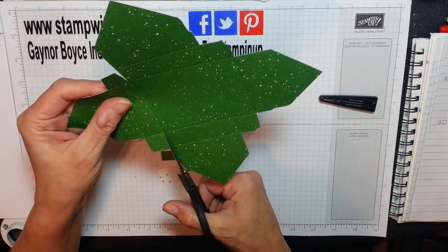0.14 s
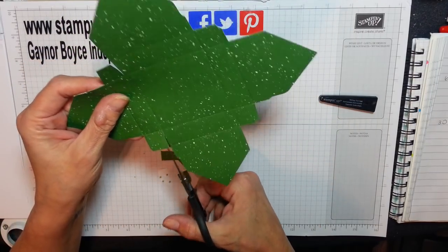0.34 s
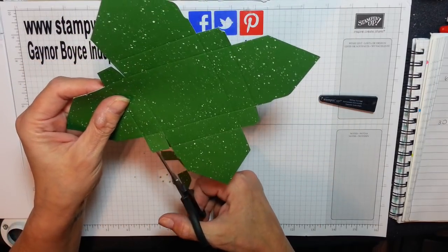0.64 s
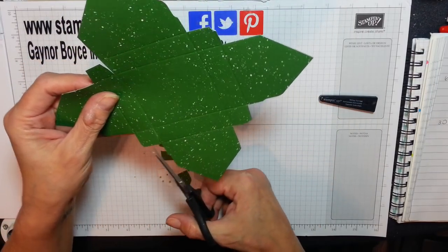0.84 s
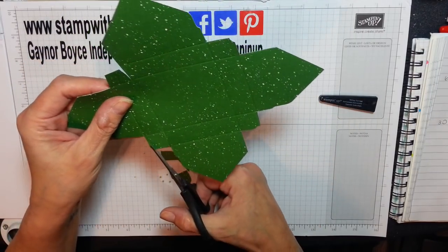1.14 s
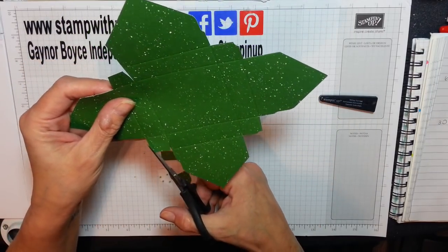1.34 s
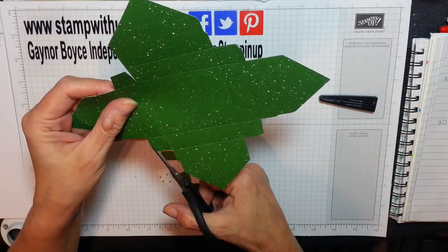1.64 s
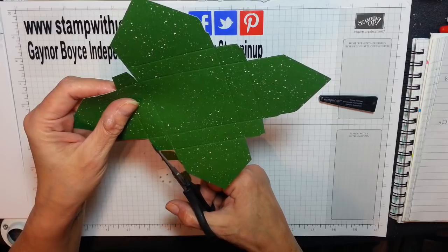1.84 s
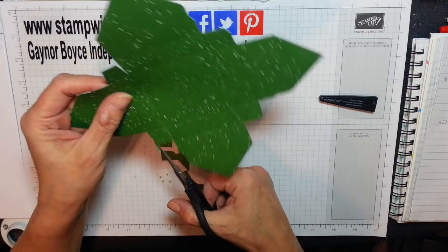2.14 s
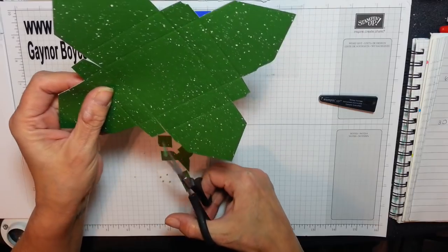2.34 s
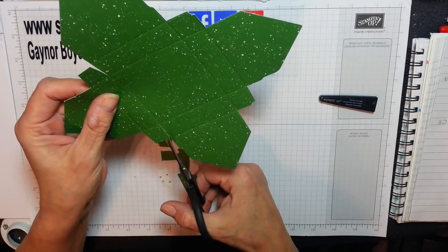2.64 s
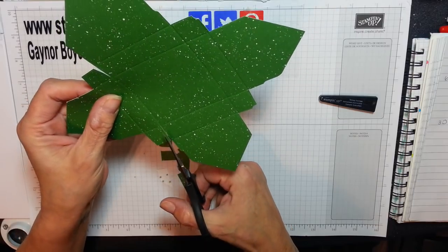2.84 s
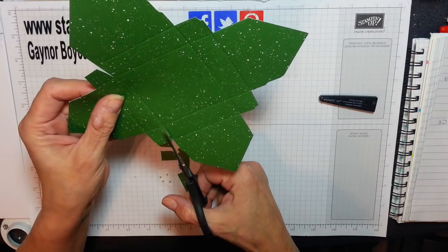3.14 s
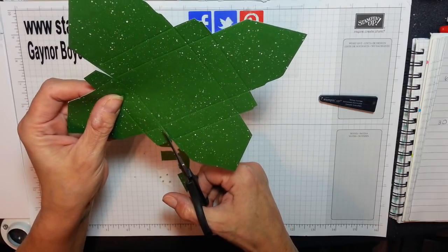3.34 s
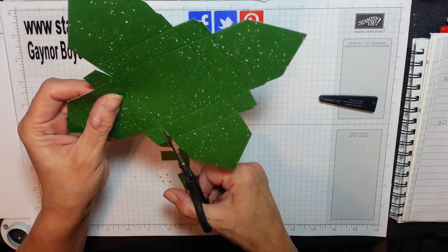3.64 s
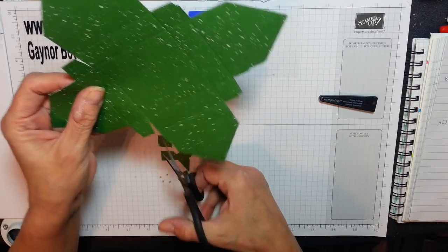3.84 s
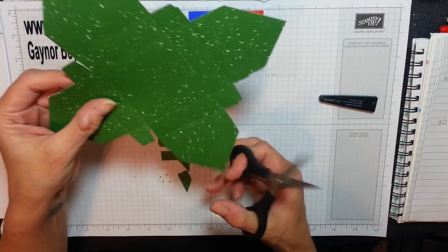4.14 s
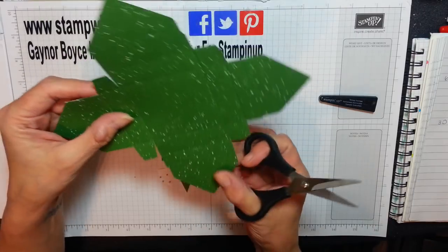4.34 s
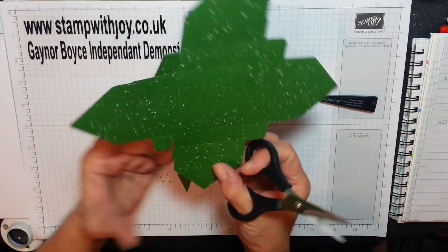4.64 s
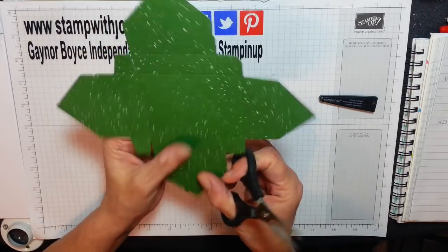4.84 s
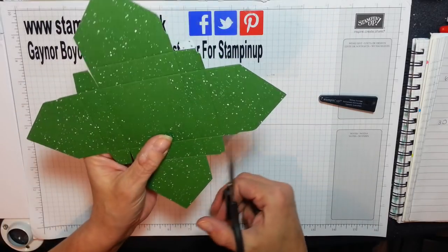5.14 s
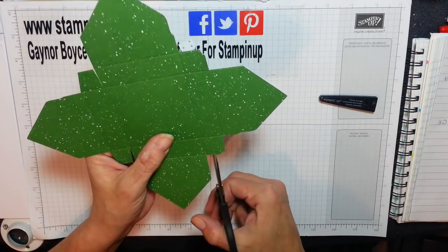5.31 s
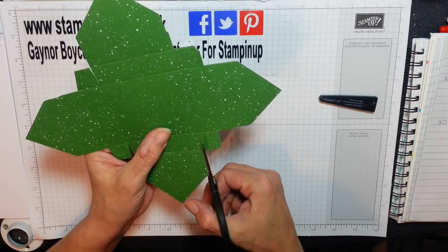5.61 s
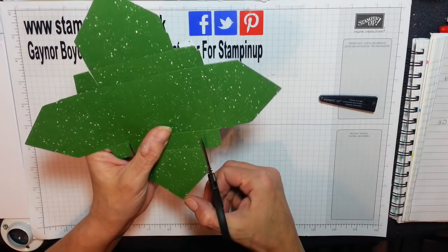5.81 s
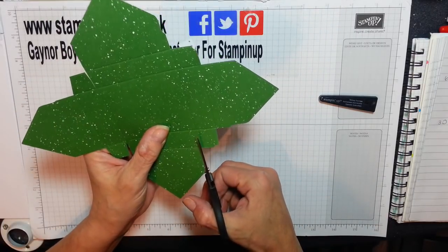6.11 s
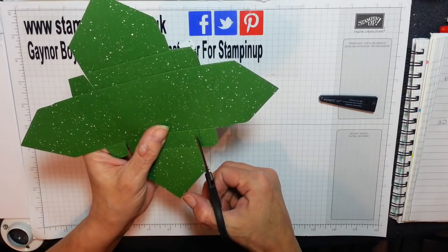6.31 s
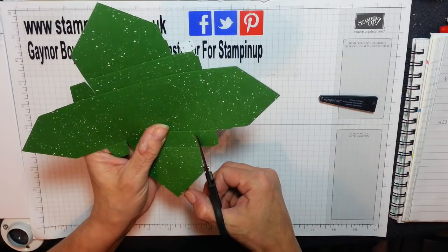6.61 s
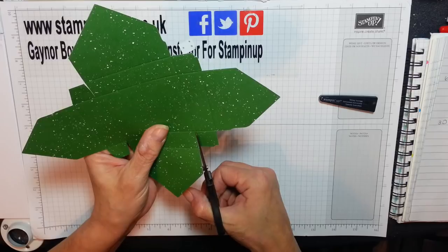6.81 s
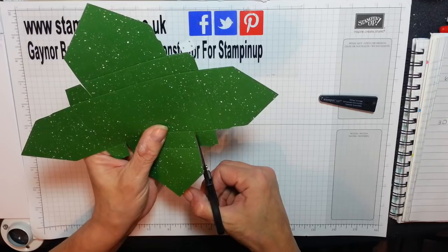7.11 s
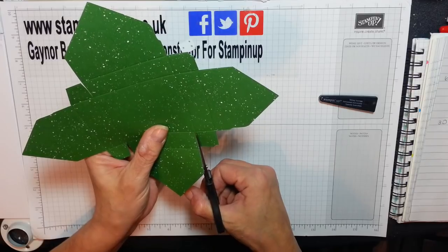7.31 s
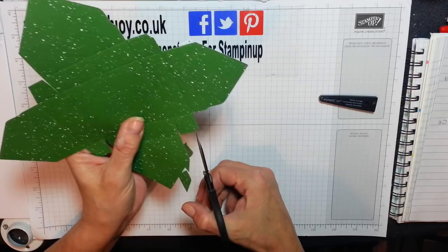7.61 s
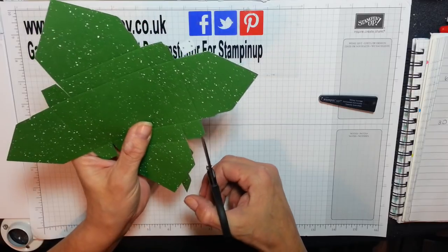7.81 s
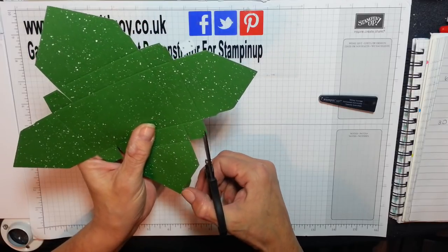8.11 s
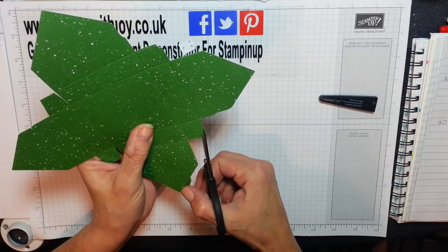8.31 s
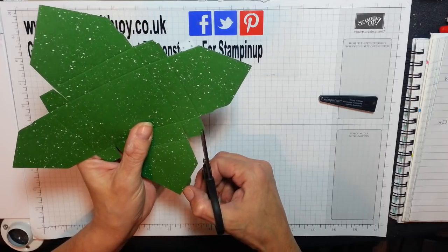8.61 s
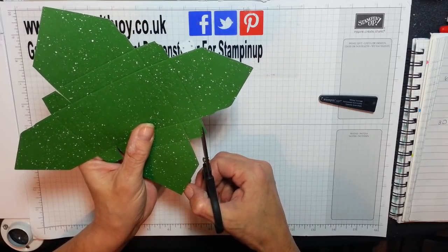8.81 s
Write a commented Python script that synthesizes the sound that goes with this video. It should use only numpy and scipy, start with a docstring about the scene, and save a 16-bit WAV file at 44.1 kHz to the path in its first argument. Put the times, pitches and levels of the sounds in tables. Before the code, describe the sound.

Close, dry snips and short rasps of scissors through thick card, a clattering cut midway, then quieter, slower cutting over a desk in a quiet room.

```python
"""Small scissors trim a cardstock shape above a desk in a small room.
The blades tear short bursts of fibres, made as random impulses, and rasp along the cut edge in gated strokes.
The sheet hisses and crinkles in the fingers as filtered impulses; its knocks and flexes ring damped modes.
Hand bumps ring desk modes over a rustle of noise that grows with the work.
Room reflections, still air, humming bands and a thin wavering whine complete the scene."""
import sys
import numpy as np
from scipy import signal
from scipy.fft import rfft, irfft, next_fast_len
from scipy.io import wavfile
from scipy.ndimage import uniform_filter1d, map_coordinates

SR = 44100
rng = np.random.default_rng(int(sys.argv[2]) if len(sys.argv) > 2 else 0)


def master(y):
    """Save y as 16-bit WAV."""
    cut = np.clip(np.atleast_2d(y).T, -1, 1)
    pcm = np.round(cut * 32767)  # scale
    wavfile.write(sys.argv[1], SR, pcm.astype(np.int16))


N = 395136

# Bites of the blades. Each row: start in seconds, length in seconds, crunch level in dB,
# sheet body in dB relative to the crunch (before body_db).
BITES = [(0.001, 0.012, -33, -11), (0.019, 0.0037, -35, -12), (0.034, 0.0072, -38.5, -10),
         (0.046, 0.011, -39, -13), (0.072, 0.0042, -29.5, -11.5), (0.09, 0.0077, -35, -13),
         (0.111, 0.0045, -26, -10), (0.119, 0.0026, -22, -10), (1.099, 0.0074, -47, -6),
         (1.638, 0.011, -48, -8.5), (1.678, 0.027, -48, -7), (1.82, 0.016, -35.5, -8),
         (1.896, .013, -41, -11.5), (1.945, 0.0066, -41, -17), (1.975, .004, -43.5, -4.5),
         (2.002, 0.0026, -18, -9.5), (2.179, .005, -23.5, -11), (2.897, 0.0046, -35, -14),
         (3.341, 0.011, -47.5, -7.5), (3.38, 0.01, -44.5, -7.5), (3.427, 0.014, -38.5, -6),
         (3.49, 0.0037, -38.5, 1.5), (3.521, 0.015, -37.5, -2.5), (3.58, 0.013, -42, -1.5),
         (3.655, 0.0018, -17, -9.5), (3.678, 0.0049, -24.5, -7), (3.928, 0.0027, -36.5, -17),
         (4.036, 0.0053, -36, -14), (4.124, .01, -27, -10), (4.138, .008, -19.5, -20),
         (5.92, 0.0066, -35, -9), (6.282, 0.0056, -49, 0), (6.309, 0.013, -47, -6),
         (6.347, 0.0092, -44, -7), (6.407, .005, -50.5, -6), (6.452, 0.0079, -50.5, -6),
         (6.47, 0.013, -49, -3), (6.501, 0.026, -48.5, -4), (6.559, 0.013, -44.5, -0.5),
         (6.61, 0.0078, -45.5, 2), (6.68, 0.015, -34, -4.5), (6.73, .012, -33, -7),
         (6.756, 0.012, -33.5, -7), (7.043, 0.0044, -34.5, -9), (7.075, 0.0097, -35, -7),
         (8.501, 0.0044, -38, -1)]
# Sliding strokes of the blades. Each row: start in seconds, end in seconds, rasp level in dB,
# swell from start to end in dB, sheet body in dB relative to the rasp (before body_db).
BLADE_STROKES = [(.325, 0.408, -38, 3, -11), (0.422, .512, -37, 5, -6), (.705, 0.766, -37.5, 2.5, -7.5),
                 (1.111, 1.253, -53, -14.5, -13), (2.125, 2.177, -48, 9, -8), (3.7, 3.77, -46.5, 1, -6.5),
                 (3.783, 3.887, -34.5, -4, -5), (4.092, 4.152, -29, 8, -12),
                 (7.475, 7.525, -41.5, -3.5, -9), (8.105, 8.187, -55, 14, -9.5),
                 (8.763, 8.797, -54, -7, -7)]
STROKE_ATTACK_S, STROKE_RELEASE_S = 0.01, 0.028  # time to gain or lose 20 dB
TIP_BODY_DB = 6  # extra swell of the sheet body as the cut runs out to the tips
# The sheet slides through the fingers as it is turned.
# Each row: start in seconds, end in seconds, level in dB before hiss_db or crinkle_db, swell in dB.
SHEET_TURNS = [(4.525, 4.565, -49.5, 7), (4.66, 4.82, -49.5, 3.5), (4.95, 5.41, -45, -3.5),
               (5.49, 5.72, -61, -12.5)]
TURN_ATTACK_S, TURN_RELEASE_S = 0.13, 0.11  # time to gain or lose 20 dB
# Faint rubbing of the steel blades at the pivot.
# Each row: start in seconds, end in seconds, level in dB before pivot_db, swell in dB.
PIVOT_RUBS = [(.6, .68, -60, 7), (1.81, 2, -58.5, 3), (2.64, 2.97, -69, 16), (3.27, 4.04, -60.5, 10.5),
              (5.91, 6.14, -67, -7), (6.3, 6.62, -64.5, 2), (8.05, 8.15, -67, 5), (8.71, 8.78, -67, 6)]
PIVOT_ATTACK_S, PIVOT_RELEASE_S = 0.047, 0.046  # time to gain or lose 20 dB
# The stiff sheet knocks against blade or hand.
# Each row: start in seconds, strength in dB before each part's gain, pitch of the struck flap in Hz.
SHEET_KNOCKS = [(0.118, -33.5, 930), (1.822, -43, 607), (2.002, -31, 986), (2.179, -32, 632),
                (3.653, -27, 1565), (4.075, -20, 487), (4.078, -26.5, 857), (4.096, -32, 480),
                (4.121, -38, 541.6), (4.152, -35, 813), (4.941, -32.5, 560), (4.957, -32, 800),
                (4.976, -40, 780), (5.922, -38, 506), (8.502, -35, 760)]
# Light ticks of the card's edge. Each row: start in seconds, strength in dB before tick_db.
EDGE_TICKS = [(4.454, -38.5), (4.498, -35), (4.567, -33), (4.94, -31), (5.512, -44), (7.654, -41),
              (7.668, -40), (7.683, -40), (7.722, -42.5)]
# Soft bumps of the hands. Each row: start in seconds, strength in dB before bump_db.
HAND_BUMPS = [(0.965, -41), (1.775, -40.5), (2.675, -46), (2.815, -45), (3.15, -44), (3.431, -38),
              (3.968, -37), (4.336, -39.5), (4.545, -42), (5.17, -40), (6.044, -38.5), (6.192, -38.5),
              (6.656, -37.5), (7.029, -40), (7.159, -35), (7.36, -47.5), (7.944, -37.5), (8.281, -43),
              (8.87, -46)]
# Every bite jolts the hands: dB (before bump_db) for a 0 dB crunch, and dB per dB of crunch.
JOLT_DB, JOLT_GROWS = -32.5, 0.35
# The whole sheet buckles as it is turned or let go. Each row: start in seconds, strength in dB.
SHEET_FLEXES = [(4.176, -41.5), (4.794, -30.5), (4.946, -32.5), (8.503, -42)]

# Spectrum of torn fibres. Each row: frequency in Hz, relative level in dB.
CRUNCH_SPECTRUM = [(200, -35), (1000, -19.5), (2500, -12), (4000, -5), (5500, -1), (7000, -4), (8500, -7.5),
                   (11000, -12.5), (14500, -22)]
# Spectrum of the sheet's crackle. Each row: frequency in Hz, relative level in dB.
BODY_SPECTRUM = [(100, -9.5), (350, -6.5), (650, -5.5), (1200, -6), (1700, -1.5), (2800, -2.5),
                 (4500, -17.5), (9000, -38.5)]
# Spectrum of steel on the cut edge. Each row: frequency in Hz, relative level in dB.
RASP_SPECTRUM = [(200, -25), (1000, -28.5), (2500, -13.5), (4000, -4), (5700, 0), (7000, 0), (8500, -7.5),
                 (11000, -13.5), (14500, -34.5)]
# Spectrum of card on skin. Each row: frequency in Hz, relative level in dB.
HISS_SPECTRUM = [(300, -13.5), (800, -18.5), (1300, -13.5), (2400, -15), (3600, -13), (5500, -4.5),
                 (7000, -5), (8800, -10.5), (11000, -16.5), (14500, -23.5)]
# Spectrum of blade on blade. Each row: frequency in Hz, relative level in dB.
STEEL_SPECTRUM = [(700, -13.5), (2000, -14), (3500, -10.5), (6000, -10.5), (7200, -4.5), (8200, -13),
                  (14000, -19.5)]
# Spectrum of a knock's contact. Each row: frequency in Hz, relative level in dB.
CRACK_SPECTRUM = [(150, -34), (500, -4.5), (1300, 1.5), (2500, -6), (5000, -2.5), (7500, -18.5),
                  (14000, -33)]
# Spectrum of the low rustle of the hands. Each row: frequency in Hz, relative level in dB.
RUSTLE_SPECTRUM = [(25, -36), (55, -25), (90, -4), (115, -16.5), (143, 2), (178, -12), (208, -2.5),
                   (250, -22.5), (305, -10), (350, -19), (450, -12), (520, -22), (900, -24), (2000, -37.5)]
# Spectrum of still air. Each row: frequency in Hz, relative level in dB.
AIR_SPECTRUM = [(25, -12), (140, -3.5), (450, -15.5), (600, -16), (900, -23), (1200, -24.5), (1380, -19.5),
                (1600, -23.5), (4500, -28.5), (7000, -27.5), (14500, -30)]

# Bending modes of the held sheet. Each row: frequency in Hz, width in Hz, relative level in dB.
SHEET_MODES = [(400, 67, -2), (506, 200, -6), (764, 45, -3), (1000, 120, 4.5), (1570, 307, 8),
               (2160, 970, -2.5)]
# Lowest modes of the buckling sheet. Each row: frequency in Hz, width in Hz, relative level in dB.
BUCKLE_MODES = [(123, 26, 2.5), (258, 19.4, -1.5), (337, 21, -6), (444, 11, -13), (560, 50, -11)]
# Resonances of the desk. Each row: frequency in Hz, width in Hz, relative level in dB.
DESK_MODES = [(92, 13, -20), (146.7, 22, -3), (211.6, 15, -8.5), (310.3, 17, -14.5), (447, 42, -12.5)]
# Humming bands of the room. Each row: frequency in Hz, width in Hz, relative level in dB.
HUM_BANDS = [(145, 19, -2), (206.5, 16, -3), (289, 23, -11), (394.7, 18, -5.5), (453.2, 17, -6)]
# The faint whine comes and goes. Each row: start in seconds, end in seconds, level in dB, swell in dB.
WHINE_SPANS = [(6.7, 8.2, -78, -0.5)]
WHINE_FADE_S = 0.3  # time to gain or lose 20 dB

# Decay of the wall reflections. Each row: frequency in Hz, time to fall 60 dB in seconds.
ROOM_DECAY = [(150, 0.33), (1000, 0.22), (4000, 0.21), (7000, 0.24), (14000, 0.097)]
# Likeness of diffuse sound at the two ears. Each row: frequency in Hz, left-right correlation.
EAR_LIKENESS = [(25, 0.52), (110, 0.96), (400, 0.74), (1000, 0.28), (2500, 0.06), (10000, .05)]
# Where the scissors work. Each row: time in seconds, left-minus-right level in dB.
WORK_PLACE = [(0, -1), (3, -3), (4.2, -2), (5.4, -2), (6.3, 1), (7.5, -2.5), (8.901, -1)]
# Unequal ears of the microphone. Each row: frequency in Hz, left-minus-right level in dB.
EAR_BALANCE = [(100, -1.5), (1000, 2.5), (2500, 1.5), (4500, 5.5), (7000, -5.5), (10000, -3.5),
               (14000, -2.5)]
TOP_HZ = 14900  # nothing passes above this


def snips(crunch_db=0, body_db=1, rise=0.00064, fall=0.0021, scrape_db=-17, approach=0.015):
    """Brittle fracture: after a scrape, fibres tear in a burst and the sheet adds a lower crackle; times in s."""
    crunch, body = np.zeros(N), np.zeros(N)
    catching = amp(1.9 * wobble(600))
    for s, length, db, sheet_db in BITES:
        first = max(int((s - 0.04) * SR), 0)
        span = np.arange(first, int((s + length + 0.02) * SR))
        t = span / SR - s
        bite = np.exp(np.minimum(t, 0) / rise)
        # a slow bite scrapes more on its way in than a quick snap
        slowness = min(length / 0.0055, 1) ** 2
        scrape = amp(scrape_db) * slowness * np.exp(np.minimum(t, 0) / approach)
        release = np.exp(-np.maximum(t - length, 0) / fall)
        burst = catching[span] * np.maximum(bite, scrape) * release
        # the energy of a burst follows its length
        burst *= np.sqrt(length * SR / (np.sum(burst ** 2) + 1e-12))
        crunch[span] += amp(db + crunch_db) * burst
        body[span] += amp(db + sheet_db + body_db) * burst
    tearing = coloured(crunch * fibres(rate=12000, spread_db=3.0), CRUNCH_SPECTRUM)
    crackle = coloured(body * fibres(rate=9000, spread_db=2), BODY_SPECTRUM)
    return tearing + crackle


def strokes(rasp_db=0, body_db=-1, catch_db=1.0, slip_db=0.5, grip_db=1.15, tear_db=2.5):
    """Stick-slip friction: steel catches and slips along the cut edge; tearing shakes the sheet unevenly."""
    drag = unit(amp(grip_db * wobble(45) + catch_db * wobble(150) + slip_db * wobble(700)))
    edge, sheet = [], []
    for start, end, db, swell, sheet_db in BLADE_STROKES:
        edge.append((start, end, db + rasp_db, swell))
        sheet.append((start, end, db + sheet_db + body_db, swell + TIP_BODY_DB))
    rasp = drag * level(edge, STROKE_ATTACK_S, STROKE_RELEASE_S)
    shaking = unit(amp(tear_db * wobble(300)))
    body = drag * shaking * level(sheet, STROKE_ATTACK_S, STROKE_RELEASE_S)
    rasping = coloured(rasp * fibres(rate=9000, spread_db=4.0), RASP_SPECTRUM)
    return rasping + coloured(body * fibres(rate=2000, spread_db=2.5), BODY_SPECTRUM)


def rubbing(hiss_db=-0.5, pivot_db=1, crinkle_db=-14):
    """Sliding friction: dense fine contacts hiss on skin and steel; sparse ones crinkle in the bending card."""
    sliding = level(SHEET_TURNS, TURN_ATTACK_S, TURN_RELEASE_S)
    skin = sliding * fibres(rate=6000, spread_db=3) * amp(hiss_db + 1.5 * wobble(80))
    crinkle = sliding * fibres(rate=270, spread_db=8) * amp(crinkle_db)
    pivot = level(PIVOT_RUBS, PIVOT_ATTACK_S, PIVOT_RELEASE_S)
    steel = pivot * fibres(rate=4200, spread_db=8.0) * amp(pivot_db + 2.8 * wobble(46))
    hiss = coloured(skin, HISS_SPECTRUM)
    return hiss + coloured(crinkle, CRUNCH_SPECTRUM) + coloured(steel, STEEL_SPECTRUM)


def knocks(sheet_db=-4, sheet_t60=0.11, flap_db=-2, flap_t60=0.039,
           crack_db=-3, crack_t60=0.022, tick_db=-1, tick_t60=0.023):
    """Impact excitation: a knock cracks and rings flap and bending modes; an edge tick is only a brief crackle."""
    sheet, contact, edge = np.zeros((3, N))
    t = np.arange(SR // 8) / SR
    for s, db, hz in SHEET_KNOCKS:
        flap = amp(flap_db - 60 * t / flap_t60) * np.sin(2 * np.pi * hz * t)
        # sheet_t60 damps the modes on top of their own decay
        bending = amp(sheet_db - 60 * t / sheet_t60) * ring(SHEET_MODES, t, scatter_db=5.5)
        add(sheet, s, amp(db) * (flap + bending))
        add(contact, s, amp(db + crack_db - 60 * t / crack_t60))
    for s, db in EDGE_TICKS:
        add(edge, s, amp(db + tick_db - 60 * t / tick_t60))
    crack = coloured(contact * fibres(rate=16000, spread_db=0.5, shared=0.27), CRACK_SPECTRUM)
    ticks = coloured(edge * fibres(rate=11000, spread_db=2.0), CRUNCH_SPECTRUM)
    return sheet + crack + ticks


def hands(work, bump_db=1, soft=0.0075, rest_db=-70, busy_db=-32, follows=0.48, effort_s=0.087):
    """Soft excitation: gradual pushes ring desk and sheet; a low uneven rustle grows with the work of the hands."""
    desk, t = np.zeros(N), np.arange(SR // 4) / SR
    push = 1 - np.exp(-t / soft)
    jolts = [(s, JOLT_DB + JOLT_GROWS * db) for s, _, db, _ in BITES]
    for s, db in HAND_BUMPS + jolts:
        add(desk, s, amp(db + bump_db) * push * ring(DESK_MODES, t, scatter_db=1.0))
    for s, db in SHEET_FLEXES:
        add(desk, s, amp(db) * push * ring(BUCKLE_MODES, t, scatter_db=0.5))
    effort = uniform_filter1d(np.abs(work).mean(axis=0), int(effort_s * SR) + 1)
    rustle = np.hypot(amp(rest_db), amp(busy_db) * np.abs(effort) ** follows)
    noise = rush(lambda hz: amp(along(RUSTLE_SPECTRUM, hz)))
    return desk + rustle * amp(2.4 * wobble(16)) * noise


def room(x, near_db=-6, near_t60=0.007, tail_db=-8, lag=0.00015):
    """Propagation: the right ear leads by lag (s); reflections are redrawn every third of a second and crossfaded."""
    hop = SR // 3
    # overlapping pieces, each with a new echo; the squared fades sum to one
    fade = np.sin(np.pi * np.arange(2 * hop) / (2 * hop))
    padded = np.pad(x, [(0, 0), (hop, 2 * hop)])
    wet = np.zeros((2, N + hop))
    for i in range(0, N + hop, hop):
        piece = padded[:, i:i + 2 * hop] * fade
        add(wet, i / SR, signal.fftconvolve(piece, echo(near_db, near_t60, tail_db), axes=1))
    late_left_early_right = np.array([[1], [-1]])
    direct = filtered(x, lambda hz: np.exp(-1j * np.pi * hz * lag * late_left_early_right))
    return (direct + diffuse(wet[:, hop:])) / np.sqrt(1 + amp(near_db) ** 2 + amp(tail_db) ** 2)


def echo(near_db, near_t60, tail_db):
    """Reverberant decay: quick scatter from desk and hands, then the walls, as a stereo impulse response."""
    hz, t, z = signal.stft(rng.standard_normal((2, SR // 4)), SR, nperseg=256)
    decay = amp(-60 * t / along(ROOM_DECAY, hz)[:, None])
    tail = signal.istft(z * decay, SR, nperseg=256)[1]
    near = rng.standard_normal(tail.shape) * amp(-60 * np.arange(tail.shape[1]) / SR / near_t60)
    near /= np.linalg.norm(near, axis=1, keepdims=True)
    tail /= np.linalg.norm(tail, axis=1, keepdims=True)
    return amp(near_db) * near + amp(tail_db) * tail


def background(air_db=-67, hum_db=-65, whine_hz=648):
    """Stationary noise and a tone: still air, resonant bands of hum and a thin phase-wavering whine."""
    def bands(f):
        return sum(amp(db) / (1 + (2 * (f - hz) / width) ** 2) for hz, width, db in HUM_BANDS)

    air = amp(air_db) * rush(lambda hz: amp(along(AIR_SPECTRUM, hz)))
    phase = 2 * np.pi * whine_hz * np.arange(N) / SR + 0.58 * wobble(37)
    whine = level(WHINE_SPANS, WHINE_FADE_S, WHINE_FADE_S) * np.sqrt(2) * np.sin(phase)
    return air + amp(hum_db) * rush(bands) + whine


def fibres(rate, spread_db, shared=0.56):
    """Shot noise of rms 1: rate snaps a second at each ear; the wide sheet sends some to both, some to one."""
    snaps = (rng.random((3, N)) < rate / SR / 2) * rng.choice([-1, 1], (3, N))
    both, *own = snaps * amp(spread_db * np.clip(rng.standard_normal((3, N)), -2, 2))
    return unit(np.sqrt(shared) * both + np.sqrt(1 - shared) * np.array(own))


def ring(modes, t, scatter_db):
    """Modal superposition: one blow excites damped resonances, each at a new strength; peak 1."""
    hz, width, db = np.transpose(modes)[:, :, None]
    strength = amp(db + scatter_db * rng.standard_normal(hz.shape)) * rng.choice([-1, 1], hz.shape)
    partials = strength * np.exp(-np.pi * width * t) * np.sin(2 * np.pi * hz * t)
    wave = np.sum(partials, axis=0)
    return wave / np.abs(wave).max()


def rush(gain):
    """Diffuse field: stereo noise of rms 1 with a gain by frequency, alike on both sides in the bass."""
    return unit(filtered(diffuse(rng.standard_normal((2, N))), gain))


def diffuse(pair):
    """Spatial coherence: two unrelated signals become left and right; long waves reach both ears alike."""
    def mid_side(hz):
        turn = np.arccos(np.clip(along(EAR_LIKENESS, hz), -1, 1)) / 2
        return np.array([np.cos(turn), np.sin(turn)])

    mid, side = filtered(pair, mid_side)
    return np.array([mid + side, mid - side])


def level(rows, attack, release):
    """Envelope in dB: (start, end, dB, swell) gestures attack, hold with a swell, release; powers add."""
    t, gain = np.arange(N) / SR, np.zeros(N)
    for start, end, db, swell in rows:
        near = slice(max(int((start - 3 * attack) * SR), 0), int((end + 3 * release) * SR))
        hold = np.interp(t[near], [start, end], [db - swell / 2, db + swell / 2])
        outside = np.maximum(start - t[near], 0) / attack + np.maximum(t[near] - end, 0) / release
        gain[near] = np.hypot(gain[near], amp(hold - 20 * outside))
    return gain


def wobble(rate):
    """Slow random modulation: straight lines between random knots, rate knots a second."""
    knots = rng.standard_normal(int(N * rate / SR) + 4)
    return map_coordinates(knots, [np.arange(N) * rate / SR], order=1)


def filtered(x, response):
    """Linear filtering: the spectrum of x times a complex response of frequency."""
    m = next_fast_len(N + SR // 2, True)
    return irfft(rfft(x, m) * response(np.fft.rfftfreq(m, 1 / SR)), m)[..., :N]


def coloured(x, spectrum, size=1024):
    """Minimum-phase filtering: causal colouring that keeps the power of white noise."""
    cepstrum = irfft(np.log(amp(along(spectrum, np.fft.rfftfreq(size, 1 / SR)))))
    # folding the cepstrum forward in time makes the filter causal
    fold = np.r_[1, np.full(size // 2 - 1, 2), 1, np.zeros(size // 2 - 1)]
    kernel = irfft(np.exp(rfft(cepstrum * fold)))
    kernel /= np.linalg.norm(kernel)
    return signal.oaconvolve(np.atleast_2d(x), kernel[None], axes=1)[:, :N]


def along(points, hz):
    """Logarithmic frequency scale: (Hz, value) points interpolated on a log axis."""
    f, v = np.transpose(points)
    return np.interp(np.log(hz + 1), np.log(f + 1), v)


def add(track, s, sound):
    """Superposition: mix a sound into a track at time s."""
    part = track[..., max(round(s * SR), 0):][..., :sound.shape[-1]]
    part += sound[..., :part.shape[-1]]


def amp(db):
    """Level to amplitude: decibels become a gain."""
    return 10 ** (np.asarray(db) / 20)


def unit(x):
    """Normalised power: scale to rms 1."""
    return x / np.sqrt(np.mean(x ** 2) + 1e-20)


def scene():
    """Superposition: scissors and card in the room, over the hands and the background."""
    place_db = np.interp(np.arange(N) / SR, *np.transpose(WORK_PLACE))
    balance = amp([place_db / 2, -place_db / 2])
    cutting = room(snips() + strokes() + rubbing() + knocks()) * balance
    return cutting + hands(cutting) + background()


def record(dry, peak_hz=7100, width_hz=800, boost=0.52, low_hz=42):
    """Transducer response: bass roll-off, a presence peak, unequal ears and a steep band limit."""
    def microphone(f):
        resonance = 1j * f * width_hz
        presence = 1 + boost * resonance / (peak_hz ** 2 - f ** 2 + resonance)
        ears = amp(along(EAR_BALANCE, f) * np.array([[0.5], [-0.5]]))
        return presence * ears * (1j * f / (low_hz + 1j * f)) ** 2

    heard = filtered(dry, microphone)
    return filtered(heard, lambda hz: np.clip((TOP_HZ - hz) / 300, 0, 1))


dry = scene()
out = record(dry)
master(out)
```